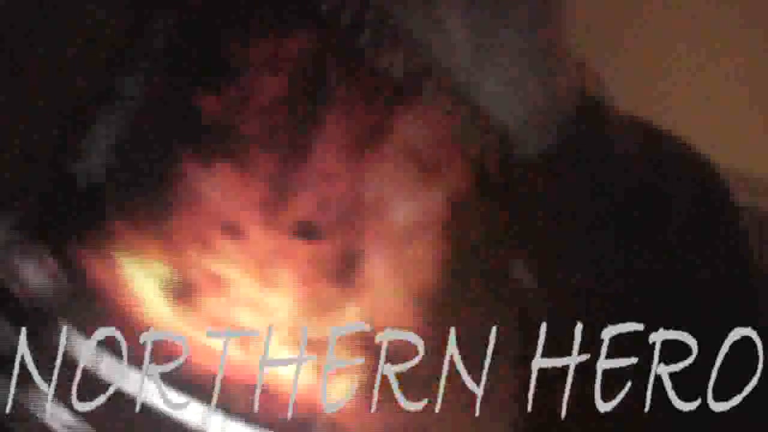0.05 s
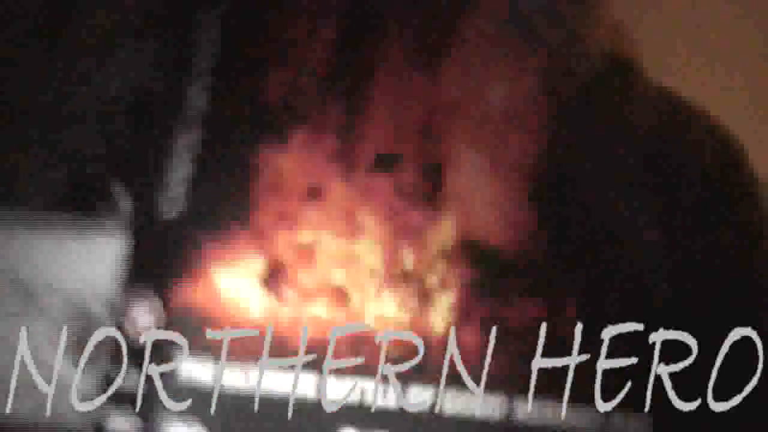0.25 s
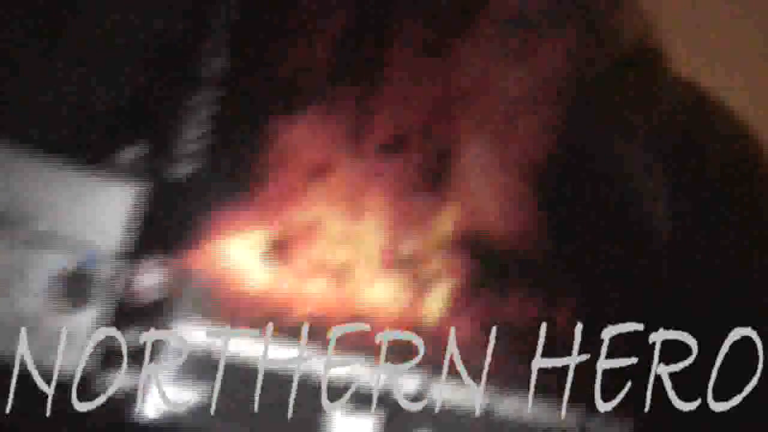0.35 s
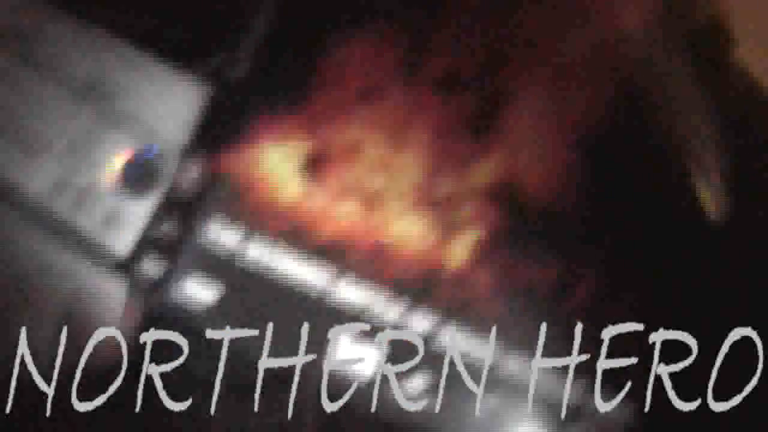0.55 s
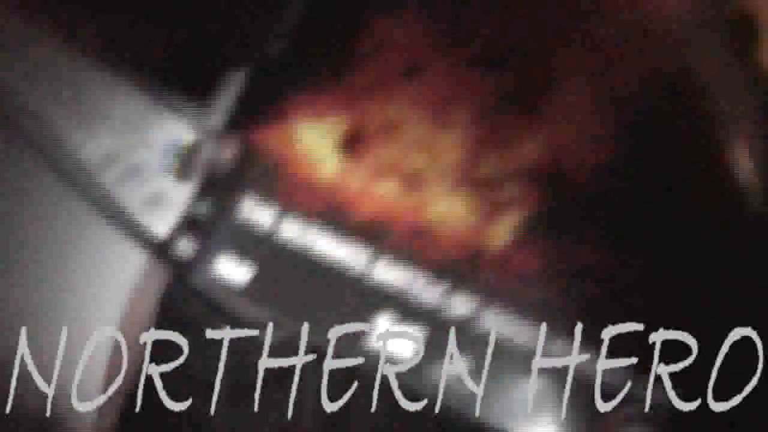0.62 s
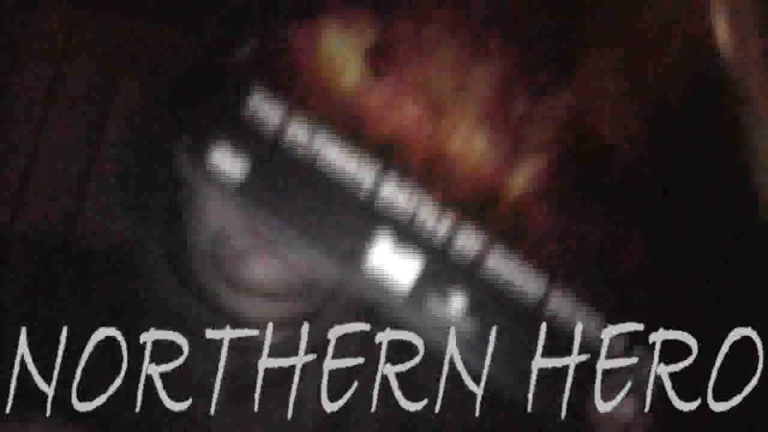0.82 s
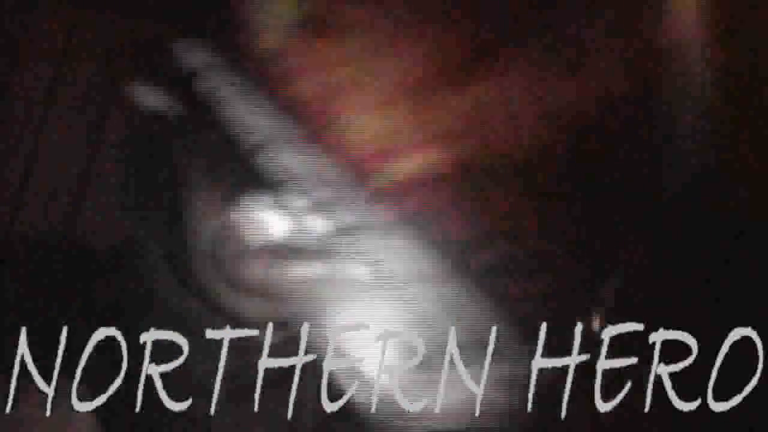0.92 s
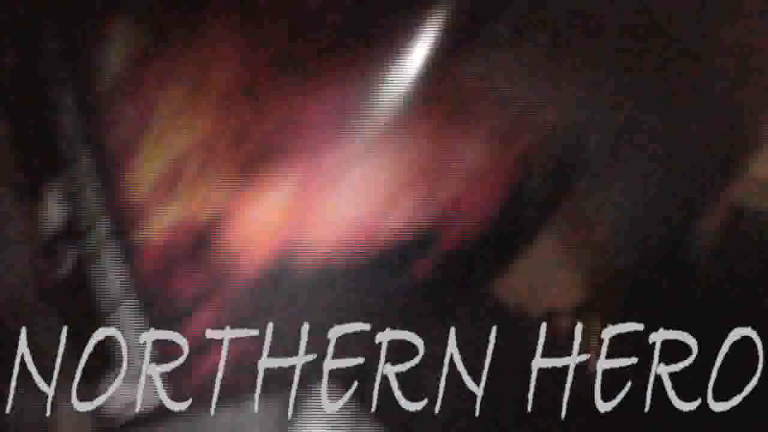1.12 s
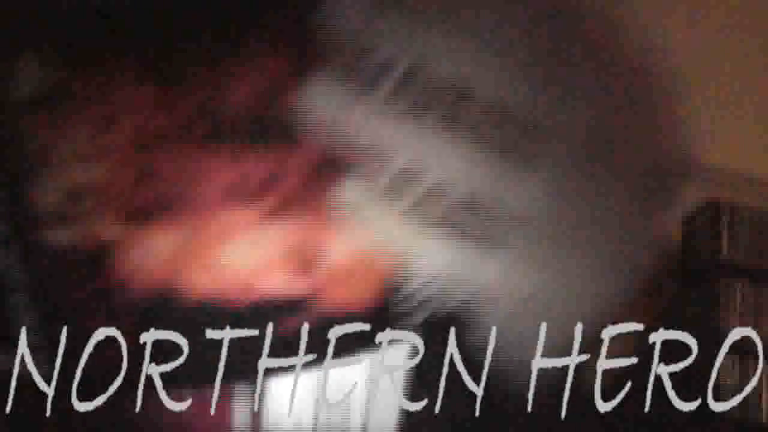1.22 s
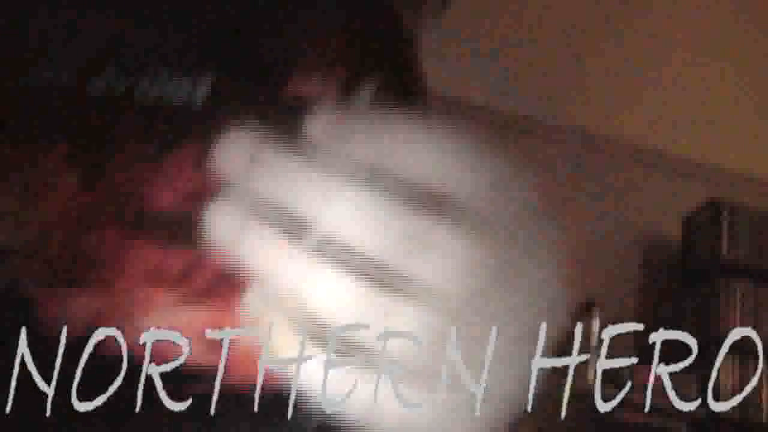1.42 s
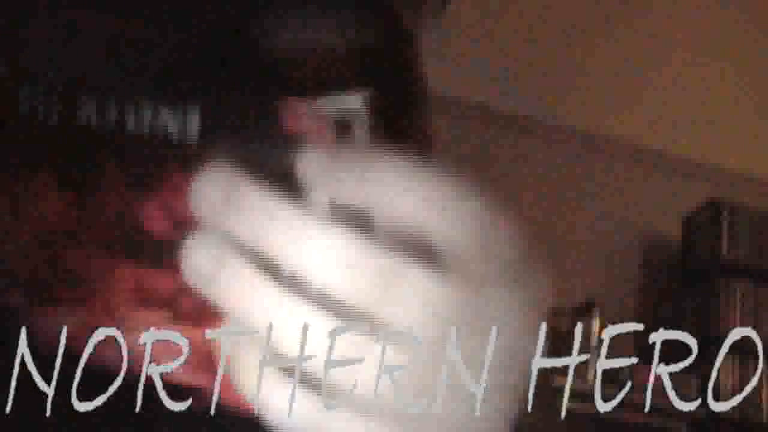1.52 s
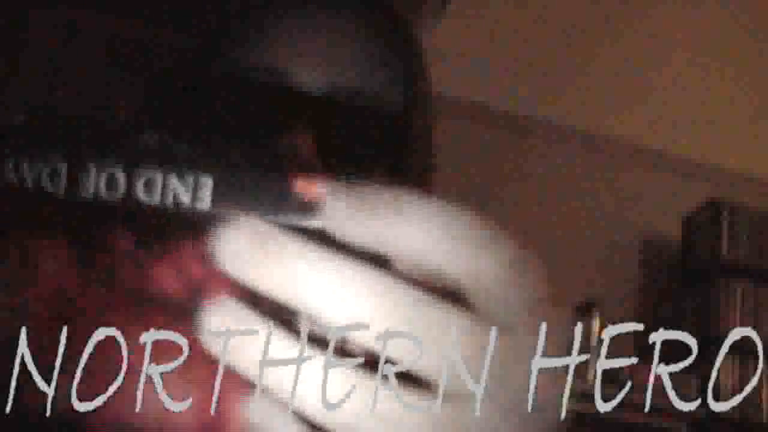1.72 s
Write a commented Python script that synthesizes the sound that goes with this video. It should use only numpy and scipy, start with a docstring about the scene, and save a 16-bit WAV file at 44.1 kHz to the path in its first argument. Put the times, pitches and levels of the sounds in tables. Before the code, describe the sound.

A paper insert is torn in one quick, bright rip with snapping fibres, close to the microphone in a small room; after a brief pause the paper crinkles and lightly knocks its plastic case over faint steady noise.

```python
"""Tearing a paper insert

A printed paper insert is torn in one quick pull, close to the microphone in a small room. The edge snaps,
then a dense rip of random fibre breaks runs on, stalling at a few catches, with stronger snaps throughout.
Afterwards the hands shift the paper, heard as crackling and popping creases, and knock lightly on its
plastic case, a set of damped modes. A decaying-noise room answer and steady noise lie beneath."""
import sys
import numpy as np
from scipy import signal
from scipy.fft import rfft, irfft, next_fast_len
from scipy.io import wavfile
from scipy.ndimage import uniform_filter1d, map_coordinates

SR = 44100
rng = np.random.default_rng(int(sys.argv[2]) if len(sys.argv) > 2 else 0)


def bounce(signal):
    """Save signal as a 16-bit WAV file at the path given by the first command-line argument."""
    frames = np.transpose(np.atleast_2d(signal))
    limited = np.clip(frames, -1, 1)
    pcm = np.round(limited * 32767).astype(np.int16)
    wavfile.write(sys.argv[1], SR, pcm)


N = 77175
T = np.arange(N) / SR  # time in seconds
LOW_SPLIT_HZ, HIGH_SPLIT_HZ = 926, 3250  # edges between bass, middle and treble
FRAME = 256  # samples in a short-time spectrum


def amp(db):
    """Decibels are logarithmic: 20 dB is a factor of ten in amplitude."""
    return 10 ** (np.asarray(db) / 20)


def unit(x):
    """Normalization to a root-mean-square value of 1."""
    return x / np.sqrt(np.mean(x ** 2) + 1e-20)


def along(points, hz):
    """Interpolation of (Hz, value) points on a logarithmic frequency axis."""
    f, v = np.transpose(points)
    return np.interp(np.log(hz + 1), np.log(f + 1), v)


def level(points):
    """Envelope: gain per sample from (s, dB) points, silent outside them."""
    s, db = np.transpose(points)
    inside = (T >= s[0]) * (T <= s[-1])
    return amp(np.interp(T, s, db)) * inside


def filtered(x, gain):
    """Minimum-phase filtering: the causal cepstrum of the log gain gives a response with no pre-echo."""
    m = 2 * next_fast_len(N)
    hz = np.fft.rfftfreq(m, 1 / SR)
    cepstrum = irfft(np.log(np.maximum(gain(hz), 1e-6)), m)
    # fold negative time onto positive time
    cepstrum[1:m // 2] *= 2
    cepstrum[m // 2 + 1:] = 0
    response = np.exp(rfft(cepstrum))
    return irfft(rfft(x, m) * response, m)[..., :N]


def coloured(x, colour):
    """Spectral shaping by a (Hz, dB) curve."""
    return filtered(x, lambda hz: amp(along(colour, hz)))


def bands(x, colour, order=8):
    """Crossover: coloured bass, middle and treble whose power shares add up to one."""
    def below(hz, edge):
        return 1 / (1 + (hz / edge) ** order)

    shares = [
        lambda hz: below(hz, LOW_SPLIT_HZ),
        lambda hz: below(hz, HIGH_SPLIT_HZ) * (1 - below(hz, LOW_SPLIT_HZ)),
        lambda hz: 1 - below(hz, HIGH_SPLIT_HZ)]
    return [filtered(x, lambda hz: amp(along(colour, hz)) * np.sqrt(share(hz))) for share in shares]


def steady(x, size=700):
    """Power normalization: the running rms is held near 1, leaving the fine spikes."""
    power = uniform_filter1d(uniform_filter1d(x ** 2, size), size)
    return x / np.sqrt(np.abs(power) + np.mean(x ** 2) / 1000)


def wobble(rate):
    """Random modulation: a smooth curve through rate random knots a second."""
    return map_coordinates(rng.standard_normal(N // 8), [T * rate], mode="wrap")


def cracks(times, sizes, ring_s, ring_db, size=400):
    """Impulsive fracture: each break is a spike and its own short ring of decaying noise."""
    decay = amp(-60 * np.arange(size) / SR / ring_s)
    ring = rng.standard_normal((len(times), size)) * decay
    ring *= amp(ring_db) / np.linalg.norm(ring, axis=1, keepdims=True)
    ring[:, 0] += rng.choice([-1, 1], len(times))
    at = (np.asarray(times) * SR).astype(int)[:, None] + np.arange(size)
    return np.bincount(at.ravel(), (ring * sizes[:, None]).ravel(), N + size)[:N]


def crackle(rate, spread_db, ring_s, ring_db):
    """Random point process: independent breaks of uneven size, on average rate of them a second."""
    sizes = amp(spread_db * np.clip(rng.standard_normal(N), -2, 2))
    hit = rng.random(N) < rate / SR
    return cracks(T[hit], sizes[hit], ring_s, ring_db)


def rip():
    """Dense fracture noise: breaking fibres shake the sheet and its loose flap; each catch stalls the run."""
    # Level of the rip in three bands. Each row: time in seconds, level in dB.
    treble = [(.17, -53.5), (.225, -33.5), (.25, -32.5), (.29, -22), (.315, -22), (.335, -22.5),
              (.365, -19), (.395, -19.5), (.425, -16.5), (.47, -17.5), (.49, -22), (.53, -18.5),
              (.6, -21.5), (.65, -14.5), (.672, -17), (.69, -22.5), (.75, -17), (.83, -19.5), (.866, -14.5),
              (.878, -20), (.916, -20), (.93, -29.5), (.97, -80)]
    middle = [(.2, -72), (.245, -38.5), (.295, -20.5), (.33, -25.5), (.365, -18), (.4, -25.5), (.45, -20),
              (.52, -19.5), (.57, -23.5), (.595, -21), (.69, -25), (.76, -21), (.81, -25.5), (.835, -24),
              (.92, -28), (.945, -49)]
    bass = [(.21, -61), (.25, -49.5), (.29, -43), (.37, -35.5), (.44, -33), (.47, -33.5), (.55, -38.5),
            (.6, -30.5), (.66, -31), (.7, -36.5), (.76, -33), (.83, -38), (.92, -44), (.96, -47)]
    # How fast the fibres break. Each row: time in seconds, fibres per second.
    fibre_rate = [(.18, 702), (.27, 2590), (.41, 2400), (.5, 3200), (.65, 4000), (.9, 3200)]
    # Colour of the shaken sheet. Each row: frequency in Hz, relative gain in dB.
    paper_colour = [(30, -32), (130, -29), (200, -21.5), (360, -9.5), (520, -11), (740, -5), (1260, -2.5),
                    (1900, 1), (2500, -0.5), (3500, 0.5), (5000, 0.5), (6400, 5), (7400, -0.5),
                    (8600, -7.5), (10400, -17.5)]
    # Resonances of the loose flap that stand out as it bends.
    # Each row: centre time in seconds, half length in seconds, frequency in Hz, width in Hz, level in dB.
    flap = [(0.301, 0.052, 734, 130, -29), (0.306, .035, 7200, 1200, -20.5),
            (0.378, 0.026, 392, 146, -33.5), (0.526, 0.026, 1404, 350, -22.5),
            (0.551, 0.12, 3714, 600, -24), (0.66, .025, 6293, 600, -19.5), (0.723, 0.015, 4509, 400, -19),
            (0.791, 0.056, 7520, 500, -23), (0.799, .025, 1330, 300, -24), (0.851, 0.028, 5166, 646, -15),
            (0.911, 0.0079, 4160, 500, -23), (0.907, 0.021, 1100, 300, -32)]
    # Stalls of the rip. Each row: centre time in seconds, length in seconds, depth in dB.
    catches = [(0.3173, 0.0031, 9), (.359, 0.0069, 11), (0.382, 0.012, 8.5), (0.4043, 0.0064, 30),
               (0.848, 0.0023, 11)]
    flutter_db, flutter_rate = 0.65, 260  # unevenness of the run, knots a second

    rate = np.interp(T, *np.transpose(fibre_rate))
    fibres = crackle(rate, spread_db=2, ring_s=.005, ring_db=-1)
    fibres = fibres * amp(flutter_db * wobble(flutter_rate))
    curves = (bass, middle, treble)
    sheet = sum(level(curve) * steady(band) for curve, band in zip(curves, bands(fibres, paper_colour)))

    for s, half, centre_hz, width, db in flap:
        drive = fibres * rng.standard_normal(N)
        ring = filtered(drive, lambda hz: 1 / (1 + (2 * (hz - centre_hz) / width) ** 2))
        swell = np.exp(-((T - s) / half) ** 2)
        sheet = sheet + amp(db) * swell * steady(ring)

    stall_db = sum(depth * np.exp(-(2 * (T - s) / length) ** 4) for s, length, depth in catches)
    return sheet * amp(-stall_db)


def snaps(ring_s=.012, ring_db=6, thin_per_db=1.1, full_db=-13):
    """Impulse radiation: thick bundles of fibres give way at once; weak ones have less bass and middle."""
    # Strong single snaps. Each row: time in seconds, level in dB (the energy as an rms over 2 ms).
    snap_events = [(.1851, -26), (.198, -33), (0.2046, -31.5), (0.208, -36), (.2137, -30), (.2265, -13.5),
                   (.2299, -11), (0.258, -18), (.2695, -14.5), (.284, -15.5), (.2884, -19), (.3215, -14),
                   (.3665, -18.5), (.3737, -13.5), (.3863, -16.5), (.409, -22), (.4285, -14), (.4708, -16),
                   (0.563, -18.5), (.5935, -16), (.7595, -16), (.8665, -12), (.8995, -15.5)]
    # Colour of a full snap. Each row: frequency in Hz, relative gain in dB.
    snap_colour = [(150, -36), (700, -14), (2000, -10), (4600, 9), (7300, 5.5), (8800, -5.5), (10500, -12)]
    out = np.zeros(N)
    for s, db in snap_events:
        thin_db = thin_per_db * min(db - full_db, 0)

        def gain(hz):
            low_share = 1 / (1 + (hz / HIGH_SPLIT_HZ) ** 4)
            return amp(along(snap_colour, hz) + thin_db * low_share)

        crack = filtered(cracks([s], np.ones(1), ring_s, ring_db), gain)
        out += amp(db) * crack / np.linalg.norm(crack) * np.sqrt(.002 * SR)
    return out


def rustle():
    """Frictional crackle: the torn paper slides under the hands in many fine breaks."""
    # Level of the sliding. Each row: time in seconds, level in dB.
    rustle_level = [(1.0, -80), (1.07, -52.5), (1.12, -74), (1.31, -59), (1.318, -39), (1.335, -45),
                    (1.351, -34.5), (1.362, -49.5), (1.392, -41.5), (1.404, -54.5), (1.44, -46.5),
                    (1.49, -46), (1.505, -44.5), (1.548, -42.5), (1.558, -38), (1.58, -42), (1.612, -43.5),
                    (1.62, -67), (1.655, -43), (1.69, -55.5), (1.75, -51.5)]
    # Colour of the sliding paper. Each row: frequency in Hz, relative gain in dB.
    rustle_colour = [(60, -22), (300, -9.5), (1200, 2), (2800, -0.5), (5500, 5), (7300, 3), (8800, -11),
                     (10500, -16)]
    grains = crackle(2000, spread_db=3, ring_s=.006, ring_db=4)
    return level(rustle_level) * steady(coloured(grains, rustle_colour))


def crinkles(t60=0.011):
    """Buckling: creases pop as short noise bursts that die at once."""
    # Popping creases.
    # Each row: time in seconds, level in dB, lead-in time constant of the envelope in seconds.
    pops = [(1.227, -34, 0.00019), (1.2378, -36, .004), (1.318, -46, 0.00046), (1.391, -38.5, .003),
            (1.424, -21, 0.0021), (1.4467, -27, 0.00078), (1.476, -30, 0.0012), (1.488, -40.5, .002),
            (1.611, -37, 0.0037), (1.729, -39.5, .001)]
    # Colour of the pops. Each row: frequency in Hz, relative gain in dB.
    crinkle_colour = [(100, -27), (400, -16), (1100, -14.5), (1600, -1), (2100, -16), (2600, 3), (3400, -3),
                      (4300, 2), (5600, 3.5), (7400, -0.5), (8800, -12.5), (10500, -17)]
    envelope = np.zeros(N)
    for s, db, lead_in in pops:
        decay = amp(db - 60 * np.maximum(T - s, 0) / t60)
        envelope += decay * np.exp(np.minimum(T - s, 0) / lead_in)
    return envelope * steady(coloured(rng.standard_normal(N), crinkle_colour), size=130)


def knocks(attack_s=.0004, rough=.5):
    """Modal synthesis: fingers and paper strike the damped case, exciting most the modes near each centre."""
    # Light knocks. Each row: time in seconds, level in dB, frequency in Hz around which the case rings most.
    strikes = [(1.201, -31.5, 1240), (1.208, -35.5, 1250), (1.228, -40, 990), (1.352, -32.5, 1550),
               (1.4447, -21, 1430), (1.458, -35, 1210), (1.526, -35.5, 1100), (1.6925, -30, 670),
               (1.695, -40.5, 298), (1.7029, -36.5, 1200), (1.7285, -39.5, 1900)]
    # Modes of the case. Each row: frequency in Hz, relative level in dB, 60 dB decay time in seconds.
    case_modes = [(265, 6.5, 0.049), (342, 4, 0.072), (573, -10, 0.05), (651, 0, 0.033), (757, -5.5, 0.08),
                  (1095, -3, 0.046), (1249, 0, 0.048), (1353, 2, 0.018), (1615, -1, 0.028),
                  (1870, -2, 0.017), (2056, 5.5, 0.023), (2770, 5, 0.019), (3800, -2, 0.0085)]
    contact_db_per_octave = 13  # fall of the excitation away from the centre
    case_low_hz = 217  # the case radiates little below this

    out = np.zeros(N + SR)
    t = np.arange(SR // 10) / SR
    hz, mode_db, t60 = np.transpose(case_modes)[:, :, None]
    attack = 1 - np.exp(-t / attack_s)
    for s, db, centre_hz in strikes:
        weight = amp(mode_db - contact_db_per_octave * np.abs(np.log2(hz / centre_hz)))
        # a random walk of phase roughens each mode
        steps = rng.standard_normal((len(case_modes), len(t)))
        drift = rough * np.cumsum(steps, axis=1) * np.sqrt(hz / SR)
        sign = rng.choice([-1, 1], hz.shape)
        ring = sign * np.sin(2 * np.pi * hz * t + drift) * amp(-60 * t / t60)
        knock = attack * (weight * ring).sum(0) / np.linalg.norm(weight)
        out[int(s * SR):][:len(t)] += amp(db) * np.sqrt(2) * knock
    return filtered(out[:N], lambda f: f ** 2 / np.hypot(f ** 2, case_low_hz ** 2))


def patchy(x):
    """Spectral fluctuation: random patches of gain over frequency and time shift the paper's colour."""
    patch_db, patch_hz, patch_s = 2.46, 259.3, .025  # depth and grid spacing
    hz, t, z = signal.stft(x, SR, nperseg=FRAME)
    grid = np.meshgrid(hz / patch_hz, t / patch_s, indexing="ij")
    field = map_coordinates(rng.standard_normal((128, 256)), grid, mode="wrap")
    return signal.istft(z * unit(amp(patch_db * field)), SR, nperseg=FRAME)[1][:N]


def room(x):
    """Reverberation: convolution with delayed noise in which each frequency dies at its own speed."""
    # Decay of the room. Each row: frequency in Hz, 60 dB decay time in seconds.
    room_t60 = [(200, 0.41), (1500, 0.19), (6000, 0.24), (10000, 0.28)]
    room_db, wall_delay_s = -10.5, .004
    hz, t, z = signal.stft(rng.standard_normal(SR // 2), SR, nperseg=FRAME)
    decay = amp(-60 * t / along(room_t60, hz)[:, None])
    tail = signal.istft(z * decay, SR, nperseg=FRAME)[1]
    tail = np.pad(tail / np.linalg.norm(tail), (int(wall_delay_s * SR), 0))
    return amp(room_db) * signal.fftconvolve(x, tail)[:N]


def room_noise():
    """Stationary noise: white noise shaped to the steady sound beneath the scene."""
    # Colour of the steady noise. Each row: frequency in Hz, relative gain in dB.
    floor_colour = [(30, -42), (100, -30), (200, -22), (280, -11.5), (355, -6), (430, -7.5), (520, -10),
                    (690, -4.5), (900, -8.5), (1150, -10), (1300, -7), (1740, -12), (3000, -15.5),
                    (6100, -16.5), (8000, -26.5), (10400, -39.5)]
    return amp(-54.5) * unit(coloured(rng.standard_normal(N), floor_colour))


def ports(mid):
    """Mid-side stereo: two close ports hear nearly the same, except in the top treble and the deep bass."""
    # What leans right. Each row: frequency in Hz, level in dB relative to the common sound.
    lean = [(30, -22), (150, -40), (3200, -79), (4300, -26.5), (6300, -20.5), (7500, -10.5), (8400, -4),
            (9500, -24), (10500, -19)]
    # What differs at random. Each row: frequency in Hz, level in dB relative to the common sound.
    scatter = [(30, -12.5), (120, -26), (500, -47), (3000, -82), (5000, -19.5), (7000, -15), (8200, -14),
               (9200, 9.5), (10500, -4)]
    hz, _, z = signal.stft(mid, SR, nperseg=FRAME)
    unrelated = np.sqrt(2) * np.exp(2j * np.pi * rng.random(z.shape))
    z = z * (amp(along(scatter, hz))[:, None] * unrelated - amp(along(lean, hz))[:, None])
    side = signal.istft(z, SR, nperseg=FRAME)[1][:N]
    return np.array([mid + side, mid - side])


def port_hiss():
    """Uncorrelated noise: each port adds its own shaped hiss."""
    # Colour of the hiss. Each row: frequency in Hz, relative gain in dB.
    hiss_colour = [(18, -55), (30, -17.5), (307, -0.5), (373, 1.5), (624, -4), (4000, -13.5), (5240, -11),
                   (9200, -22), (10400, -27), (13500, -60), (22000, -120)]
    return amp(-68) * unit(coloured(rng.standard_normal((2, N)), hiss_colour))


def scene():
    """Superposition: paper and case close by, the room's answer, steady noise and hiss add up."""
    near = patchy(rip() + rustle()) + snaps() + crinkles() + knocks()
    return ports(near + room(near) + room_noise()) + port_hiss()


def record(dry):
    """Band limiting: samples are kept within full scale, then everything above 10.55 kHz is removed."""
    top_hz = 10550
    m = next_fast_len(N + SR // 4)
    passed = np.fft.rfftfreq(m, 1 / SR) < top_hz
    return irfft(rfft(np.clip(dry, -1, 1), m) * passed, m)[:, :N]


dry = scene()
out = record(dry)
bounce(out)
```